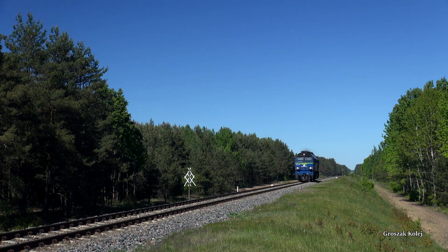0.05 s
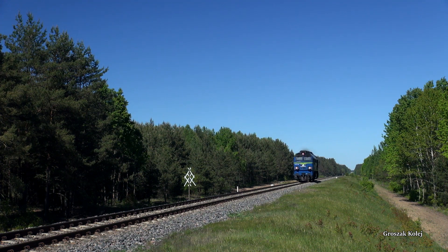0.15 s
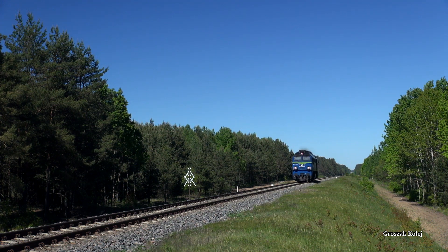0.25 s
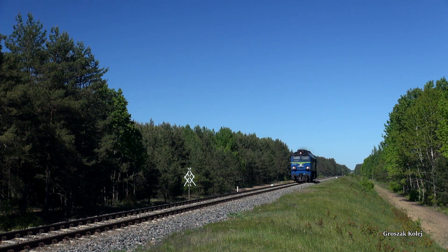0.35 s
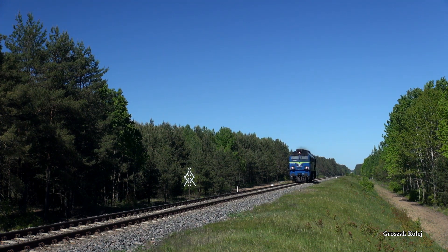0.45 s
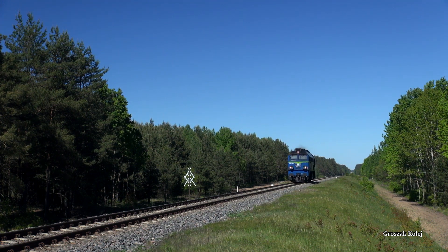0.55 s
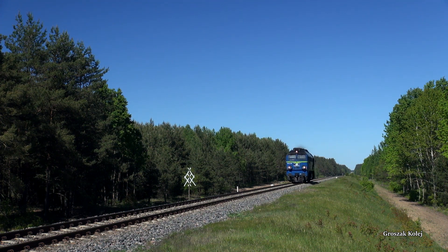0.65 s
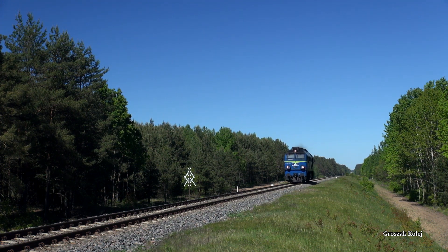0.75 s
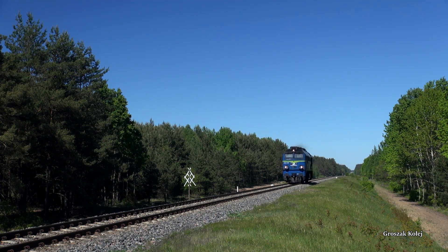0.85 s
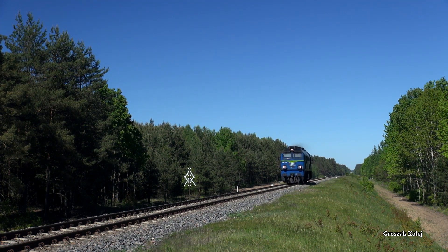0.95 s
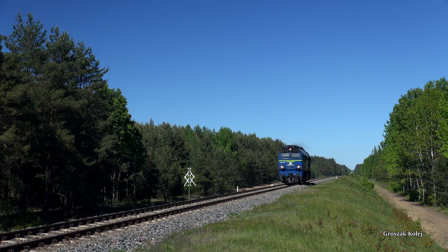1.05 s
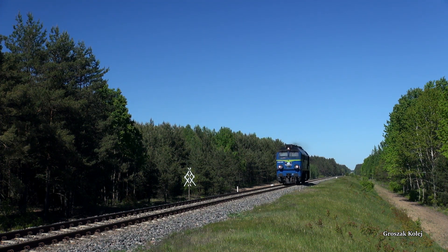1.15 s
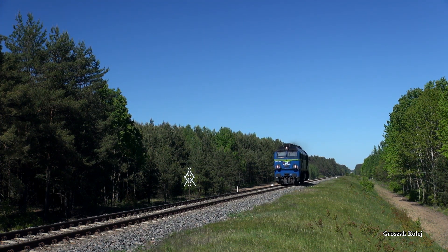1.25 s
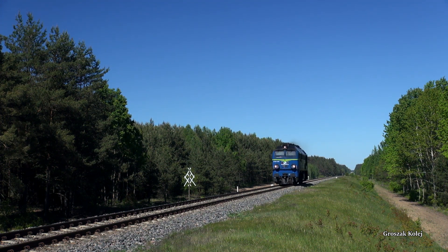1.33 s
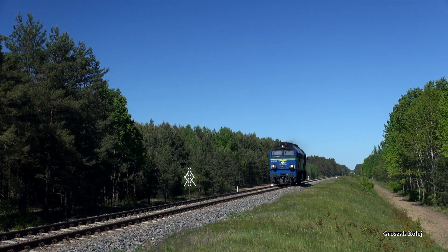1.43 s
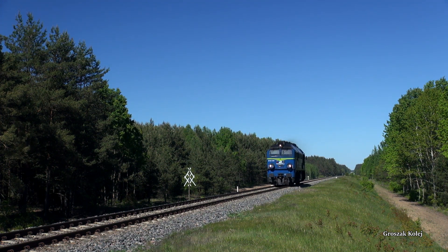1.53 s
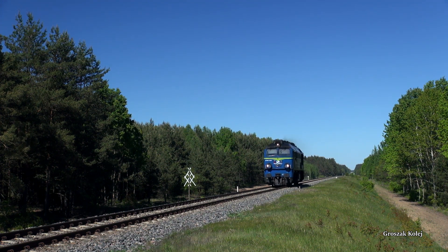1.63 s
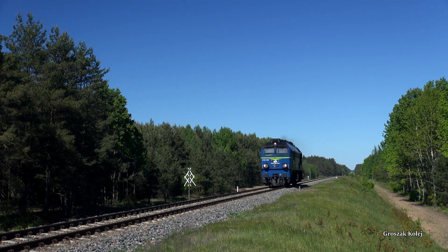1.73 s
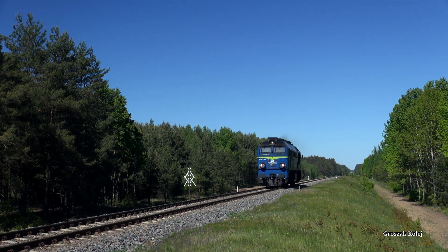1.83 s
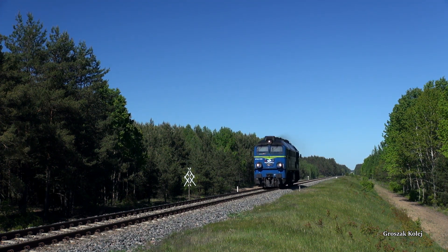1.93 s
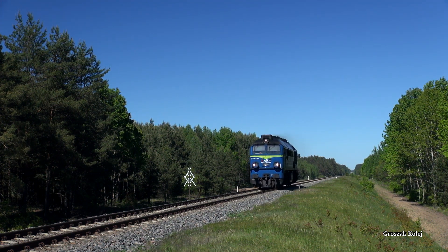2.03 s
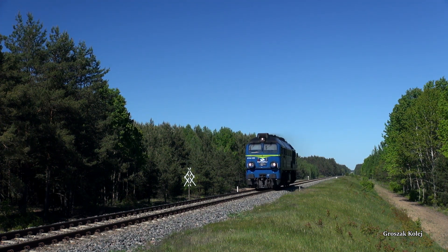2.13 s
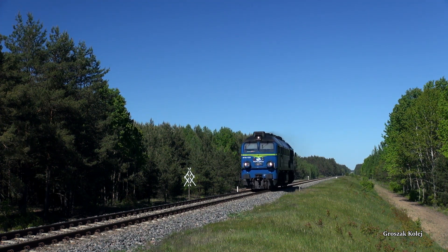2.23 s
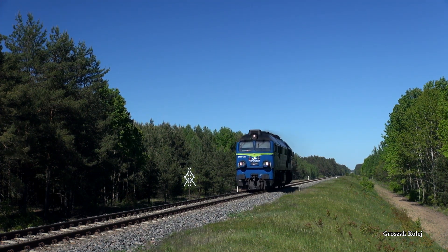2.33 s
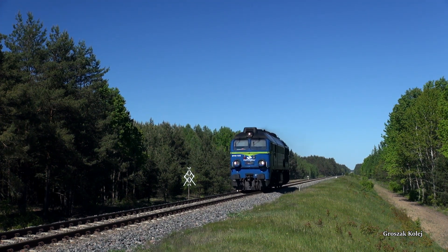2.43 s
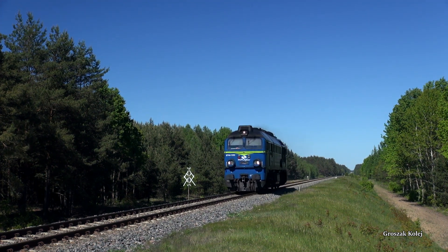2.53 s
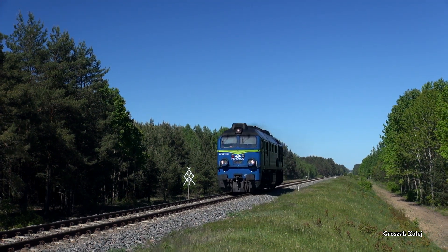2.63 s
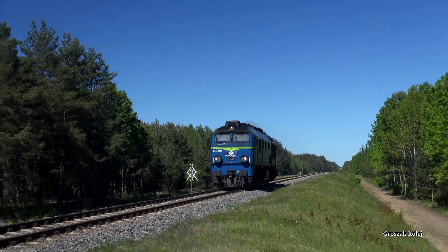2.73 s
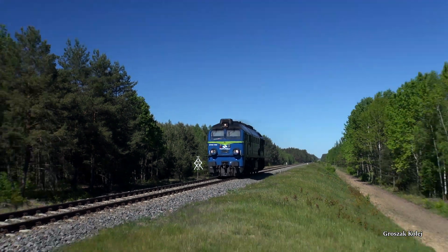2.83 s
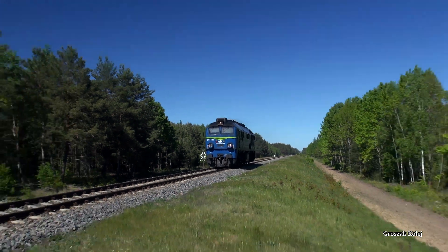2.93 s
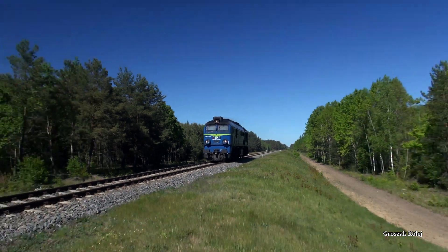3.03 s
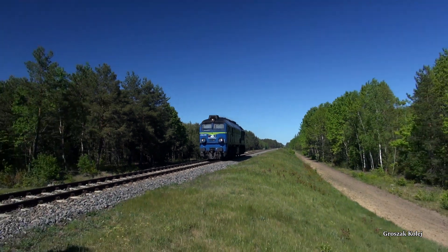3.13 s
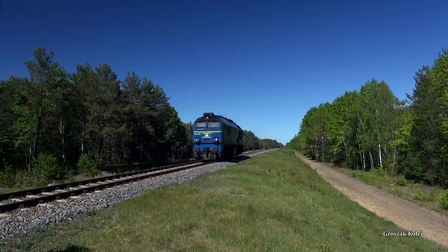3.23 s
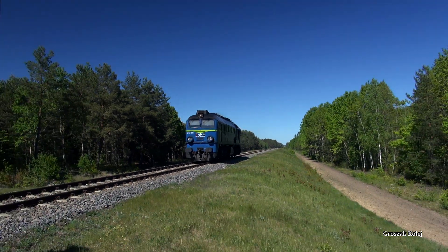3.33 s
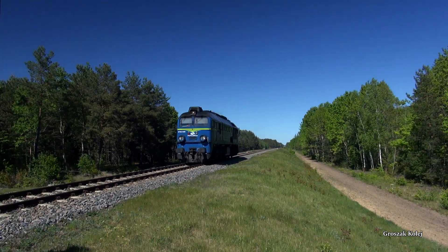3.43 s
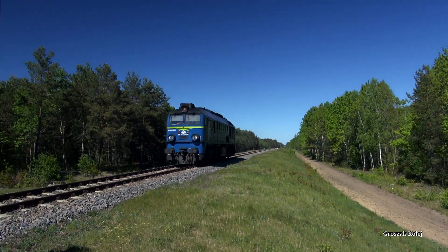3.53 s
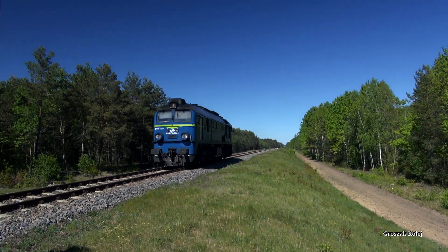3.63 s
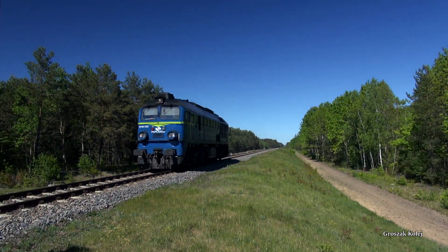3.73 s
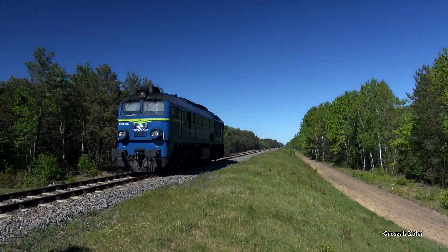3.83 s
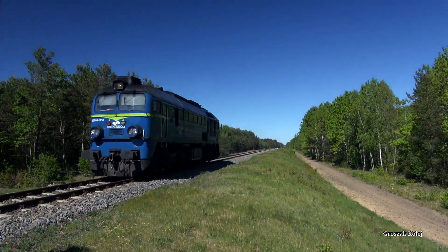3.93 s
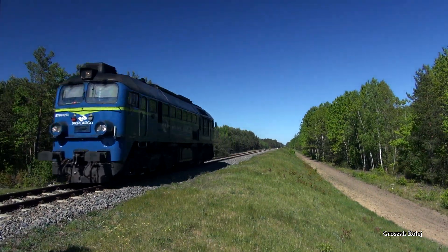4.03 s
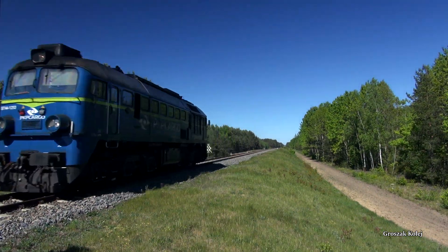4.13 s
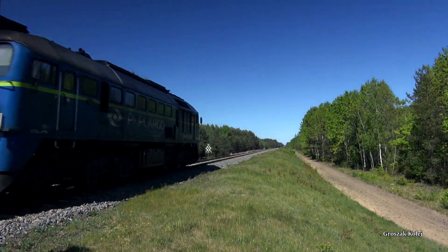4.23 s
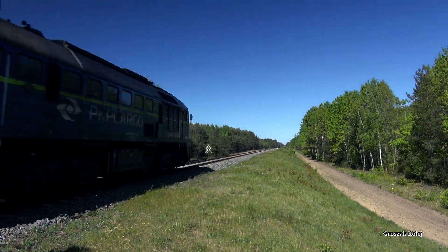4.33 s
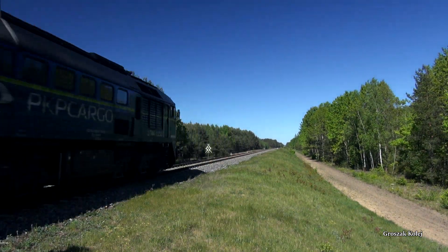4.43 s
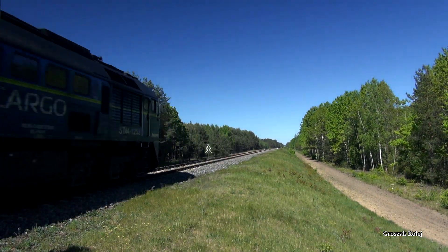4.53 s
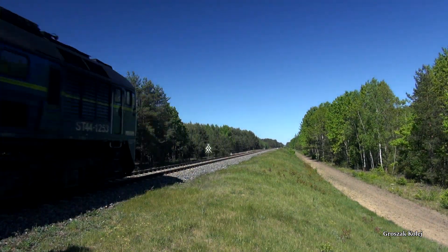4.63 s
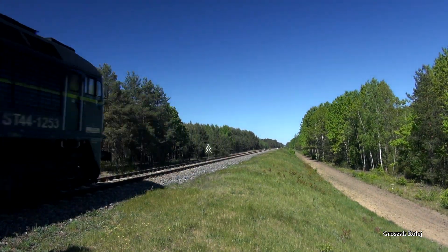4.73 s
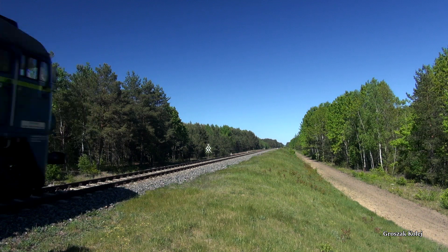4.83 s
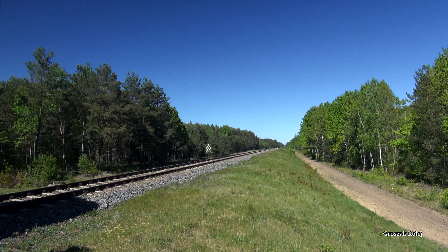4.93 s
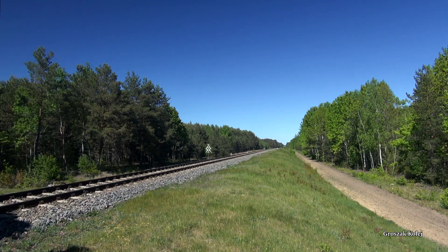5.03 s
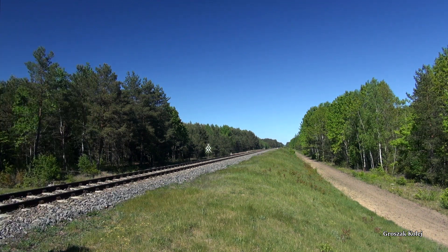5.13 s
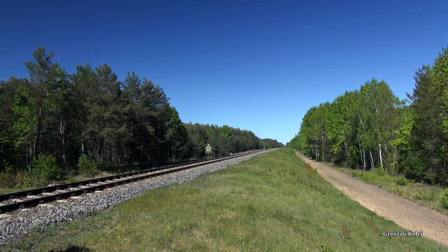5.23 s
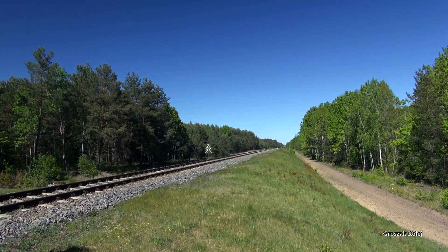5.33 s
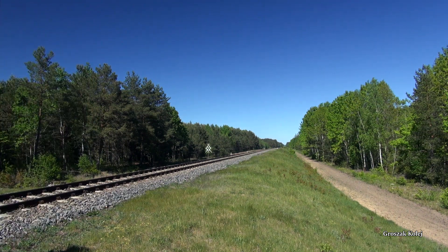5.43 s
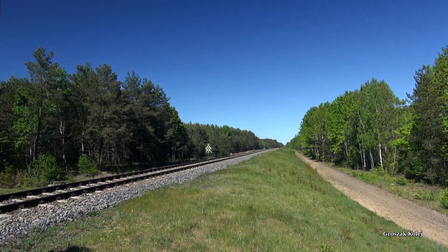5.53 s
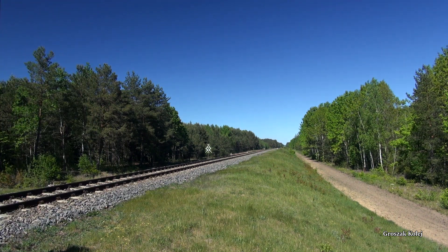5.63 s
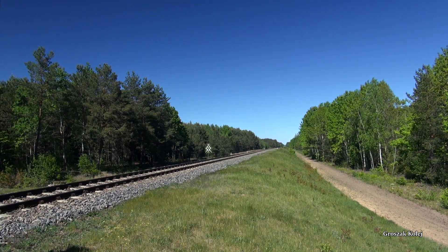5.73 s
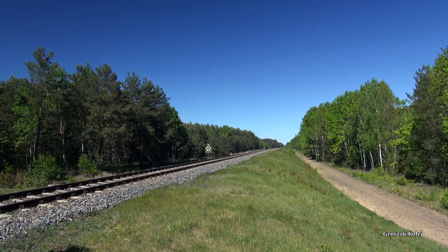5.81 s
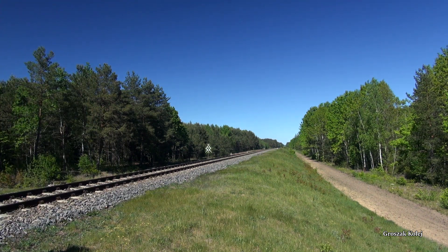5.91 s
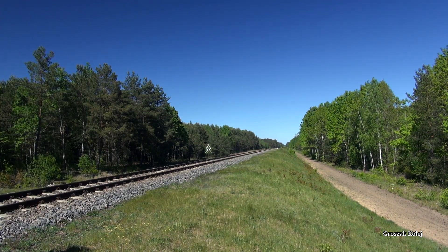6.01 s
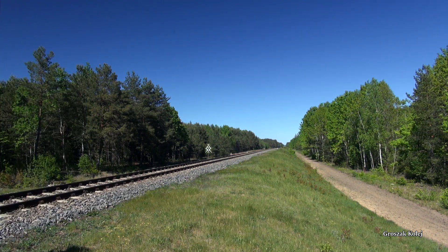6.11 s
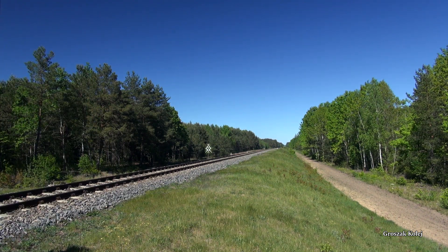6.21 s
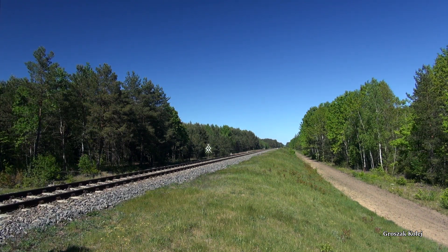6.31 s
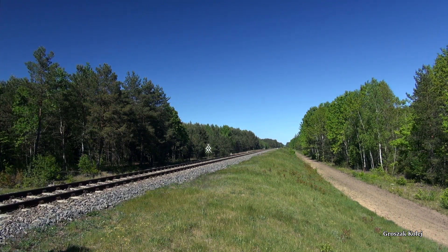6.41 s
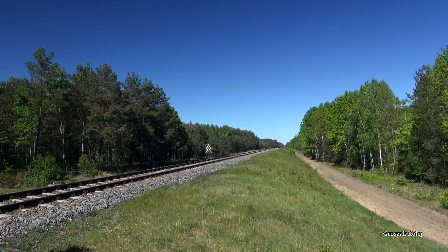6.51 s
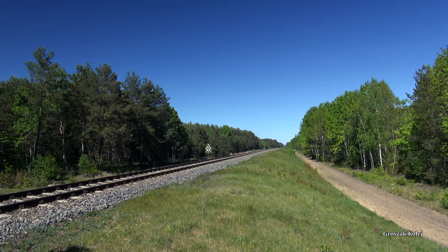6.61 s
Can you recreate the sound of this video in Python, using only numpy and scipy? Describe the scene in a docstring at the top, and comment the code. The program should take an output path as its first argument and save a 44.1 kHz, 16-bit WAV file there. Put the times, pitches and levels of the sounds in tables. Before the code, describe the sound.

The wheel roar of a single diesel locomotive swells, rushes past with ringing rails and a dropping engine throb, and recedes.

```python
"""A rolling roar swells, passes and fades: a lone diesel locomotive on straight track through forest.
Wheel and rail roughness sets the track ringing and pinging; the roar's colour and stereo image
change with the direction it comes from. The idling engine's exhaust throbs and drops in pitch
as it passes. Around it: a few sharp ticks close by, light puffs of wind, a thin hiss."""
import sys
import numpy as np
from scipy import signal
from scipy.fft import rfft, irfft
from scipy.io import wavfile

SR = 44100
rng = np.random.default_rng(int(sys.argv[2]) if len(sys.argv) > 2 else 0)


def int16_out(signal):
    """Quantize to a 16-bit WAV file."""
    q = np.round(np.clip(np.atleast_2d(signal).T, -1, 1) * 32767)
    wavfile.write(sys.argv[1], SR, q.astype(np.int16))


N = 294162
SPEED_M_S, ABEAM_S, TRACK_DISTANCE_M = 22.38, 4.757, 6.98


def from_db(db):
    """Decibels to gain."""
    return 10 ** (np.asarray(db) / 20)


def in_time(table):
    """Columns of a time table at every sample."""
    times_s, *columns = np.transpose(table)
    return [np.interp(np.arange(N) / SR, times_s, column) for column in columns]


def at_hz(table, hz):
    """Columns of a frequency table, interpolated on a log axis."""
    points_hz, *columns = np.transpose(table)
    return [np.interp(np.log(hz), np.log(points_hz), column) for column in columns]


def bandpass(x, edges_hz, order=2):
    """Butterworth band-pass."""
    return signal.sosfilt(signal.butter(order, edges_hz, "band", fs=SR, output="sos"), x)


def drift(rate_hz):
    """Slow random wander, rms 1."""
    hop, settle = 40, 2000
    pole = np.exp(-2 * np.pi * hop * rate_hz / SR)
    white = rng.standard_normal(N // hop + settle + 2)
    slow = signal.lfilter([1], [1, -2 * pole, pole * pole], white)[settle:]
    return np.interp(np.arange(N) / hop, np.arange(len(slow)), slow / slow.std())


def stereo_noise(colour, image, resonances=(), top_hz=14400):
    """Coloured noise with resonances, partly correlated between channels; right rms 1."""
    hz = np.maximum(np.fft.rfftfreq(N, 1 / SR), 10)
    right_db, = at_hz(colour, hz)
    left_db, correlation = at_hz(image, hz)
    for centre_hz, width_hz, lift_db in resonances:
        right_db += lift_db / (1 + np.abs(2 * (hz - centre_hz) / width_hz) ** 3)
    right_db -= 24 * np.maximum(np.log2(colour[0][0] / hz), 0)   # roll-off below the table
    right_db -= 10 * np.log10(1 + (hz / top_hz) ** 80)
    shared, own = rfft(rng.standard_normal((2, N)))
    left = from_db(left_db) * (correlation * shared + np.sqrt(1 - correlation ** 2) * own)
    pair = irfft(from_db(right_db) * np.array([left, shared]), N)
    return pair / pair[1].std()


def emission_time(ahead_m=0):
    """When the sound now arriving left a point ahead of the locomotive's middle; gives Doppler shift."""
    t = np.arange(N) / SR
    sent_s = t
    for _ in range(4):
        sent_s = t - np.hypot(SPEED_M_S * (sent_s - ABEAM_S) + ahead_m, TRACK_DISTANCE_M) / 343
    return sent_s


def beyond(past_m, knee_m=1.6):
    """Distance past a mark, easing to zero before it."""
    return knee_m * np.logaddexp(0, past_m / knee_m)


def zone_db(name, along_m, half_length_m=6):
    """A layer's level by distance to the locomotive's nearest part; it fades outside its zone."""
    # layer: (level [dB], loss [dB/distance doubling], start [m past abeam], end [m past abeam],
    # fade before [dB/m], fade after [dB/m])
    zones = {"far": (-18.5, 5, -78, -39, 0.02, 2), "near": (-18, 4, -29, -6.5, 0.2, 1),
             "drone": (-12, 4, -4.5, 9, 0.7, 1.5), "rumble": (-9, 3.5, -12, 10, 1.65, 2),
             "ring": (-14, 6, -12, 5.5, 0.8, 1.05), "rattle": (-9.5, 1, -10.5, 8, 2, 3),
             "sizzle": (-8.5, 1.5, -9.5, 5, 1.3, 1.5), "gone": (-25, 1.3, 8.5, 17, 4, 0.2),
             "wheel": (-20.5, 4, -13.5, -10, .5, 1.5), "top": (-10.5, -4, -5, 8, 1.3, 1.5),
             "sinking": (-19, 5.5, -7.5, -1.5, 1.5, .5)}
    level_db, doubling_db, start_m, end_m, before_db_m, after_db_m = zones[name]
    distance_m = np.hypot(np.maximum(np.abs(along_m) - half_length_m, 0), TRACK_DISTANCE_M)
    outside_db = before_db_m * beyond(start_m - along_m) + after_db_m * beyond(along_m - end_m)
    return level_db - doubling_db * np.log2(distance_m / TRACK_DISTANCE_M) - outside_db


def hiss(correlation=0.63):
    """Thin, faint treble noise."""
    # spectrum: (frequency [Hz], relative density [dB])
    colour = [(4000, -20), (6100, -7), (6700, 2), (7700, 1), (8000, -10), (11000, -11.5), (14500, -12)]
    # envelope: (time [s], level [dB])
    envelope = [(0, -67.5), (.75, -66.5), (1.35, -62), (3.5, -65), (5.7, -67), (6.67, -67.5)]
    # (frequency [Hz], left minus right [dB], correlation)
    image = [(7000, -0.5, correlation), (11100, 1.5, correlation), (12100, -16, correlation)]
    level_db, = in_time(envelope)
    return from_db(level_db) * stereo_noise(colour, image)


def wind_puffs(half_width_s=0.06, band_hz=(131, 290), left_db=-5):
    """Light wind on the microphone: soft lumps of low noise."""
    # (time [s], level [dB])
    puffs = [(.1, -48), (.75, -45.5), (1.07, -47)]
    t = np.arange(N) / SR
    lumps = sum(from_db(db) * np.exp(-((t - at_s) / half_width_s) ** 2) for at_s, db in puffs)
    low = bandpass(rng.standard_normal(N), band_hz)
    return lumps * low / low.std() * from_db([[left_db], [0]])


def ticks(treble_from_hz=6000):
    """Sharp ticks close by: a clean pulse and a short crackle drive broad resonances."""
    # bursts: (time [s], drive level [dB], length [s], treble offset [dB])
    bursts = [(2.4715, -32.5, 0.0021, 4), (2.634, -32, .002, -12), (3.5583, -11.5, 0.0036, -1.5),
              (3.562, -19, 0.0018, -6)]
    # resonances: (frequency [Hz], width [Hz], gain [dB], left minus right [dB])
    resonances = [(2400, 350, 7.5, -7.5), (3080, 150, 7.5, -8), (4430, 130, 5, -10), (8100, 2900, -15, 8.5),
                  (13300, 2000, -8, -15)]
    t = np.arange(round(0.02 * SR)) / SR
    snap = 4.6 * np.exp(-((t - 0.0002) / 0.00005) ** 2)
    drive = np.zeros((2, N))   # rows: low, treble
    for at_s, db, length_s, treble_db in bursts:
        crackle = rng.standard_normal(len(t)) / (1 + (t / length_s) ** 8)
        start = round(at_s * SR)
        drive[:, start:start + len(t)] += from_db([[db], [db + treble_db]]) * (crackle - snap)
    out = np.zeros((2, N))
    for hz, width_hz, db, left_db in resonances:
        radius = np.exp(-np.pi * width_hz / SR)
        gain = (1 - radius ** 2) / 2
        feedback = [1, -2 * radius * np.cos(2 * np.pi * hz / SR), radius ** 2]
        rung = signal.lfilter([gain, 0, -gain], feedback, drive[int(hz > treble_from_hz)] + 1e-18)
        out += from_db([[db + left_db], [db]]) * rung
    return out


def track_pings():
    """A track mode briefly swells and dies as a rough spot is rolled over."""
    # (time [s], frequency [Hz], peak [dB], length [s], left minus right [dB])
    pings = [(1.297, 1390, -28.5, 0.0049, 0), (1.43, 1024, -30, 0.0046, 0),
             (1.432, 1414, -30, 0.0082, -2.5), (1.892, 1010, -33.5, 0.055, 0),
             (4.319, 599.6, -14, 0.014, 2), (4.353, 560, -12, 0.0081, 2), (4.71, 393.7, -9, 0.02, 1),
             (4.845, 265, -17.5, 0.097, -0.5), (5.277, 266.3, -18.5, 0.093, -1.5),
             (5.966, 604, -25, 0.0063, -9), (4.373, 447.5, -10, 0.019, 1.5), (4.65, 2500, -19, 0.014, -0.5),
             (5.398, 400.4, -13, 0.0094, -5.5), (5.563, 450, -13.5, 0.0042, -10),
             (6.024, 2780, -41, .025, -13), (5.07, 2490, -29, .03, -5), (5.185, 2920, -31, 0.035, -11)]
    t, out = np.arange(N) / SR, np.zeros((2, N))
    for at_s, hz, db, length_s, left_db in pings:
        span = slice(round((at_s - 2 * length_s) * SR), round((at_s + 2 * length_s) * SR))
        swell = np.exp(-(2 * (t[span] - at_s) / length_s) ** 2)
        tone = np.sin(2 * np.pi * (hz * t[span] + rng.random()))
        out[:, span] += from_db([[db + left_db], [db]]) * swell * tone
    return out


def exhaust(crank_hz=4.73, phase_zero_s=2.49, behind_m=4.5, left_db=-23):
    """Twelve uneven firings a turn: neighbouring crank orders beat, swelling once per turn."""
    # exhaust tones: (crank order, relative level [dB], polarity)
    orders = [(11, -2.5, 1), (12, 0, 1), (13, -8, -1), (14, -15, 1), (16, -19, -1), (17, -18, 1),
              (18, -13, 1)]
    # envelope: (time [s], gain [dB])
    envelope = [(0.0, -66), (1.45, -58), (1.9, -44.5), (2.56, -36), (2.8, -28), (3.6, -27), (4.12, -25.5),
                (4.72, -22.5), (4.9, -29), (5.3, -40), (5.55, -43), (6.67, -38)]
    sent_s = emission_time(-behind_m)
    crank_rad = 2 * np.pi * crank_hz * (sent_s - sent_s[round(phase_zero_s * SR)])
    tones = sum(sign * from_db(db + drift(1.5)) * np.cos(order * crank_rad) for order, db, sign in orders)
    gain_db, = in_time(envelope)
    flutter_db = 4 * drift(7.1)
    return tones * from_db([gain_db + left_db + flutter_db, gain_db])


def wheel_ring(centre_hz=560.6, width_hz=71, front_bogie_m=6.0):
    """The leading wheels ring in a noise band that drops in pitch as they pass."""
    rung = bandpass(rng.standard_normal(N + SR), [centre_hz - width_hz / 2, centre_hz + width_hz / 2])
    read_s = emission_time(front_bogie_m) + 1   # 1 s lead-in covers the travel time
    return np.interp(read_s * SR, np.arange(N + SR), rung / rung.std())


def sinking_ring(width_hz=86):
    """A broad ring that sinks in pitch as the body passes."""
    # glide: (time [s], centre [Hz])
    glide = [(4.1, 608.6), (4.45, 540), (4.75, 439.9), (5.1, 387.7), (5.5, 310.5)]
    centre_hz, = in_time(glide)
    lowpass = signal.butter(2, width_hz / 2, fs=SR, output="sos")
    slow = signal.sosfilt(lowpass, rng.standard_normal((2, N)))
    phase = 2 * np.pi * np.cumsum(centre_hz) / SR
    rung = slow[0] * np.cos(phase) + slow[1] * np.sin(phase)
    return rung / rung.std()


def track_roar():
    """Roughness rings the track: one stereo noise per direction (far, near, beside, gone)."""
    # spectra: (frequency [Hz], relative density [dB])
    far = [(42.0, -24), (90.0, -7.5), (140.0, -8), (230.0, -5.5), (330.0, -8), (520.0, 1.5), (780.0, -1.5),
           (1200.0, -6), (1800.0, -11.5), (3000.0, -17.5), (5500.0, -42.5), (8500.0, -70), (11500.0, -43),
           (15000.0, -44)]
    near = [(35.0, -10), (90.0, -1.5), (140.0, -7), (230.0, -13.5), (330.0, -4), (520.0, -3.5), (780.0, -6),
            (1200.0, -12), (1800.0, -19.5), (3000.0, -21.5), (5500.0, -33.5), (8500.0, -40.5),
            (11500.0, -50.5), (15000.0, -59)]
    beside = [(35.0, -9), (90.0, -4.5), (140.0, -2), (230.0, -5), (330.0, -2), (520.0, 0.5), (780.0, 3),
              (1200.0, -15), (1800.0, -15.5), (3000.0, -20), (5500.0, -33), (8500.0, -34.5),
              (11500.0, -51.5), (15000.0, -48)]
    gone = [(35.0, 2), (90.0, 4.5), (140.0, 3.5), (230.0, -5.5), (330.0, 1), (520.0, -6), (780.0, -3),
            (1200.0, -14.5), (1800.0, -7.5), (3000.0, -17), (5500.0, -29.5), (8500.0, -35.5),
            (11500.0, -41), (15000.0, -47)]
    # stationary track resonances and dips: (frequency [Hz], width [Hz], lift [dB] per direction)
    modes = [(262, 35, 1, 1, 4, 5), (375, 100, 0, 0, 4, -1), (388, 50, 4, 8, 5, 9), (389, 20, 0, 1, 0, 4),
             (450, 60, 3, 0, -3, 4), (510, 50, 2, 1, 2, 3), (605, 70, 0, 8, 2, 3), (638, 30, 0, 0, 0, 7),
             (715, 60, 1, -3, -3, 2), (860, 70, 0, 4, 3, 0), (970, 40, 3, 1, 0, 4), (1005, 100, 9, 8, 3, 5),
             (1110, 100, 1, 1, 1, -4), (1375, 180, 7, 2, 0, -1), (1460, 50, 4, 2, 0, 9),
             (1525, 60, -4, -1, 0, -2), (1700, 300, 1, 2, 1, -7), (2230, 150, 7, 5, 2, 5),
             (2500, 280, 4, 5, 3, 4), (2760, 60, 0, 0, 0, 5), (4650, 750, 6, 6, 4, 1),
             (6900, 900, 2, 4, 0, 0), (9100, 900, 3, 6, 3, 0), (11300, 900, 4, 4, 1, 2)]
    # stereo image: (frequency [Hz], then per direction: left minus right [dB], correlation)
    image = [(90.0, -11.0, 0.91, -24.0, 0.24, -21.0, -0.65, -12.0, -0.93),
             (140.0, -9.0, 0.9, -15.0, -0.68, -16.0, 0.88, -8.0, -0.96),
             (230.0, -6.0, 0.92, -8.0, 0.9, -1.0, 0.98, -14.0, -0.79),
             (290.0, -8.0, 0.93, -5.0, 0.95, 0.0, 0.99, -18.0, -0.5),
             (390.0, -7.0, 0.95, -3.0, 0.99, 0.0, 1.0, -8.0, 0.98),
             (510.0, -7.0, 0.97, -3.0, 0.99, 0.0, 0.99, -16.0, 0.8),
             (620.0, -6.0, 0.98, -2.0, 0.99, -1.0, 0.99, -9.0, 0.91),
             (780.0, -4.0, 0.98, -2.0, 0.99, 0.0, 0.99, -10.0, -0.62),
             (985.0, 0.0, 0.99, 1.0, 0.99, 0.0, 0.99, -12.0, -0.76),
             (1200.0, -1.0, 0.99, 0.0, 0.99, -1.0, 0.99, -3.0, -0.97),
             (1420.0, -1.0, 0.99, -2.0, 0.96, -2.0, 0.98, -11.0, -0.4),
             (1800.0, -7.0, 0.97, -7.0, 0.96, -3.0, 0.98, -4.0, -0.96),
             (2300.0, -4.0, 0.97, -5.0, 0.97, -3.0, 0.98, -8.0, -0.96),
             (4500.0, -9.0, 0.83, -8.0, 0.96, -3.0, 0.99, -3.0, -0.96),
             (8000.0, 0.0, 0.72, -2.0, 0.72, 0.0, 0.86, 0.0, -0.58),
             (10800.0, 1.0, 0.72, 3.0, 0.72, 4.0, 0.8, 1.0, -0.5),
             (12200.0, -18.0, 0.02, -18.0, -0.04, -15.0, 0.06, -13.0, 0.19)]
    modes, image = np.array(modes), np.array(image)
    return [stereo_noise(colour, image[:, [0, 1 + 2 * k, 2 + 2 * k]], modes[:, [0, 1, 2 + k]])
            for k, colour in enumerate((far, near, beside, gone))]


def rolling(wheel_diameter_m=1.05, fade_from_m=5.5, fade_db_m=3.5, fade_max_db=5):
    """Rough wheels on rough rail: layers fade in and out along the track, uneven once per wheel turn."""
    far, near, beside, gone = track_roar()
    edges_hz = [20, 307, 441.4, 1090, 6160, 11700, 20000]
    drone, rumble, ring, rattle, sizzle, top = [bandpass(beside, band_hz, order=3)
                                                for band_hz in zip(edges_hz, edges_hz[1:])]
    sent_s = emission_time()
    along_m = SPEED_M_S * (sent_s - ABEAM_S)
    fade_db = np.minimum(fade_db_m * beyond(along_m - fade_from_m), fade_max_db)
    left_fade = from_db([-fade_db, np.zeros(N)])   # as the bogies move away
    layers = dict(far=far, near=near, drone=drone, rumble=rumble,
                  ring=left_fade * ring, rattle=left_fade * rattle, sizzle=left_fade * sizzle,
                  gone=gone, wheel=wheel_ring(), top=top, sinking=left_fade * sinking_ring())
    wheel_turn_db = 0.4 * np.cos(2 * SPEED_M_S / wheel_diameter_m * sent_s)
    return sum(layer * from_db(zone_db(name, along_m) + wheel_turn_db + 0.5 * drift(12))
               for name, layer in layers.items())


def scene():
    """Stereo mix: the passing locomotive over hiss, with ticks, pings and wind."""
    return hiss() + rolling() + exhaust() + ticks() + track_pings() + wind_puffs()


def record(dry, ceiling=1.3, cutoff_hz=16300):
    """Soft clip, then a steep low-pass."""
    rounded = ceiling * np.tanh(dry / ceiling)
    return signal.sosfilt(signal.cheby2(12, 60, cutoff_hz, fs=SR, output="sos"), rounded)


dry = scene()
out = record(dry)
int16_out(out)
```